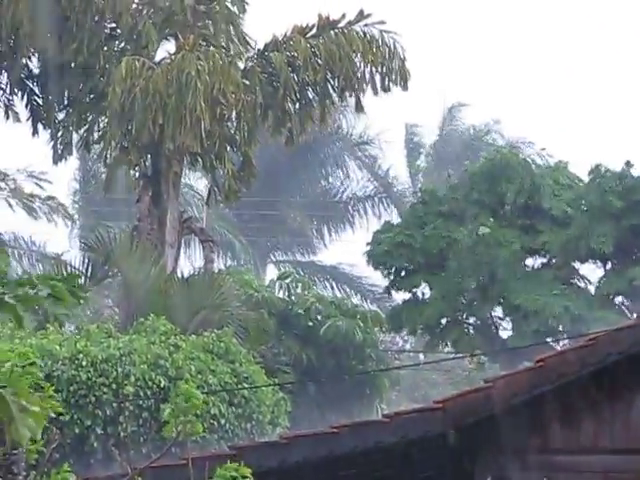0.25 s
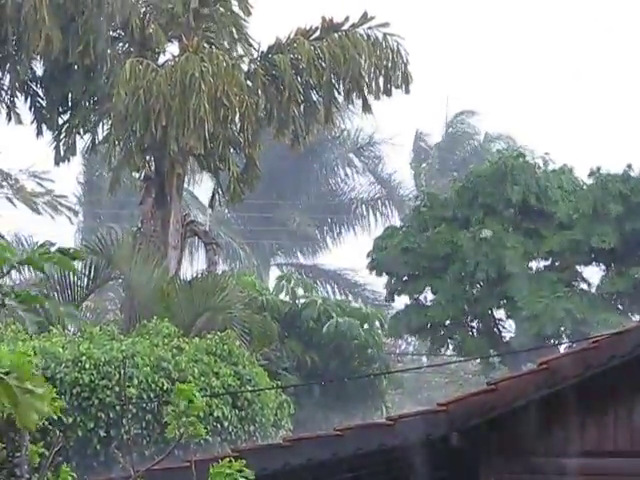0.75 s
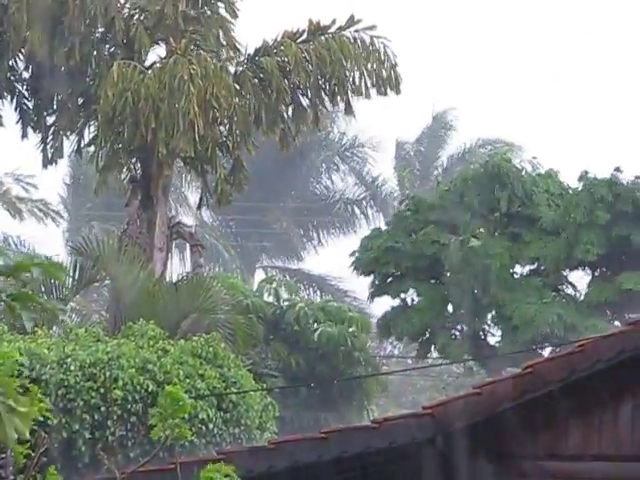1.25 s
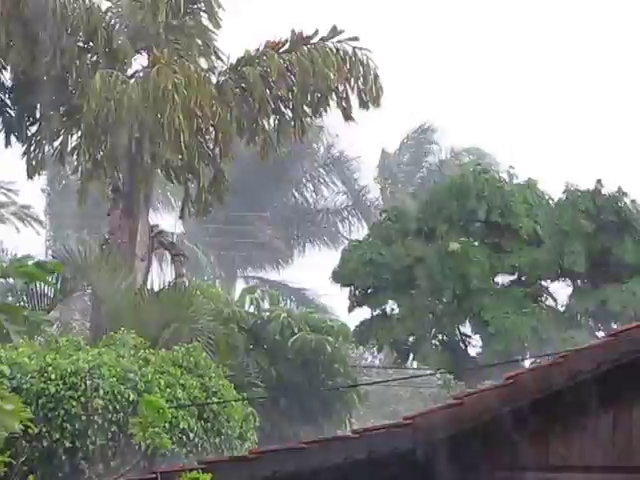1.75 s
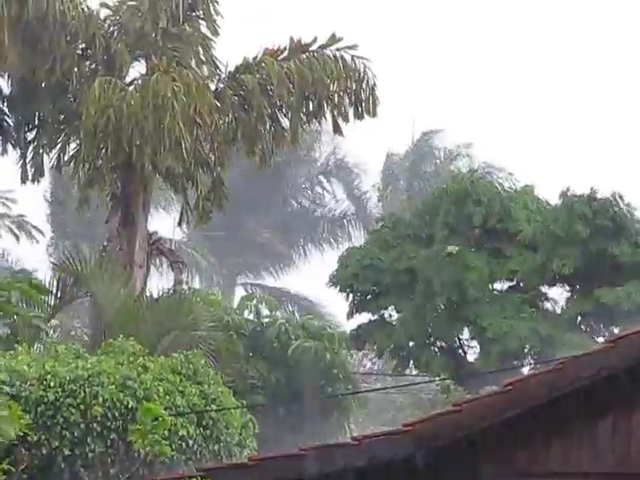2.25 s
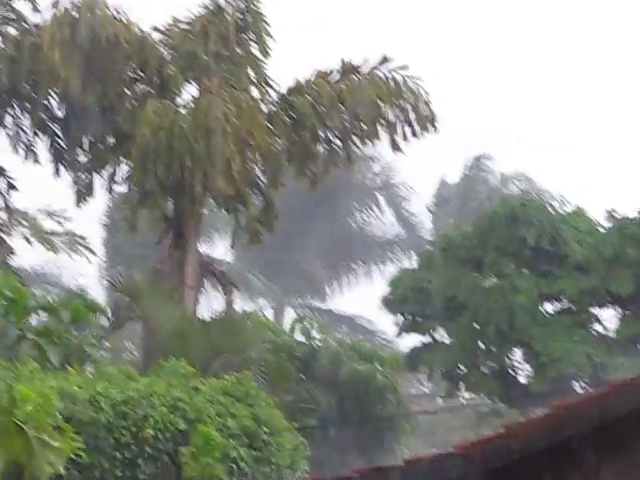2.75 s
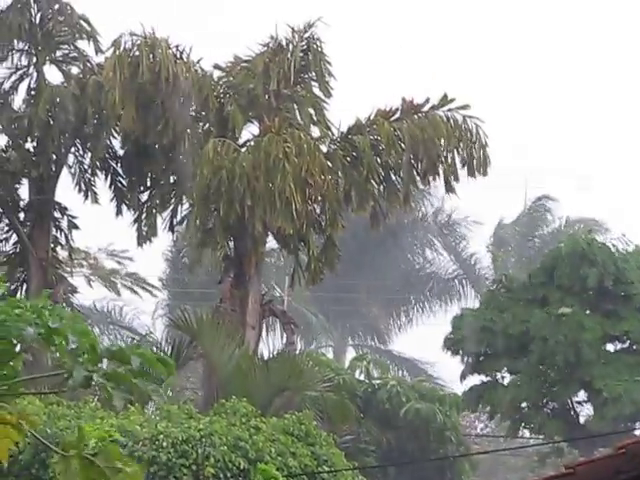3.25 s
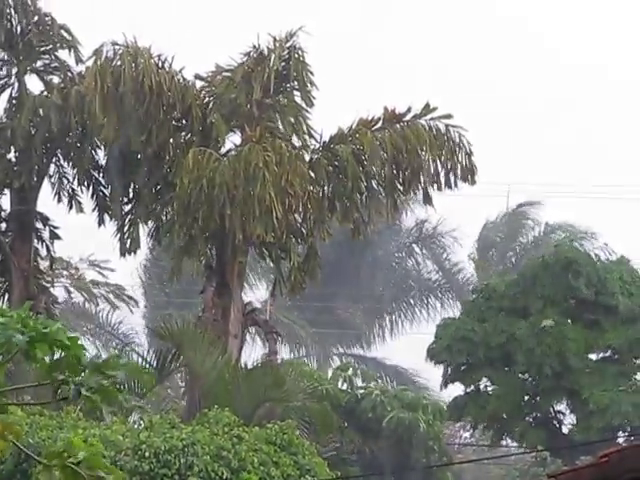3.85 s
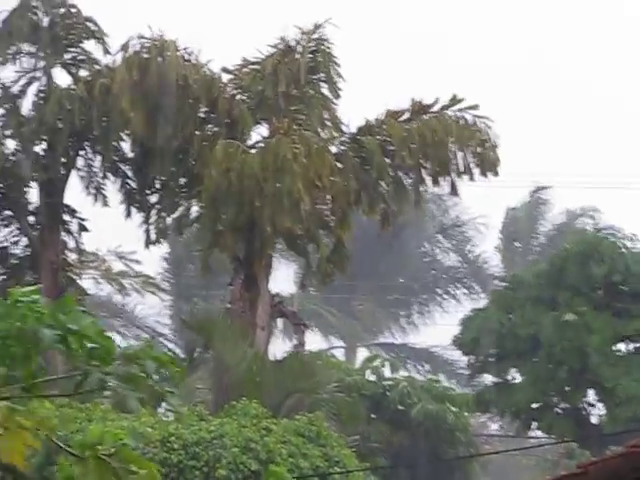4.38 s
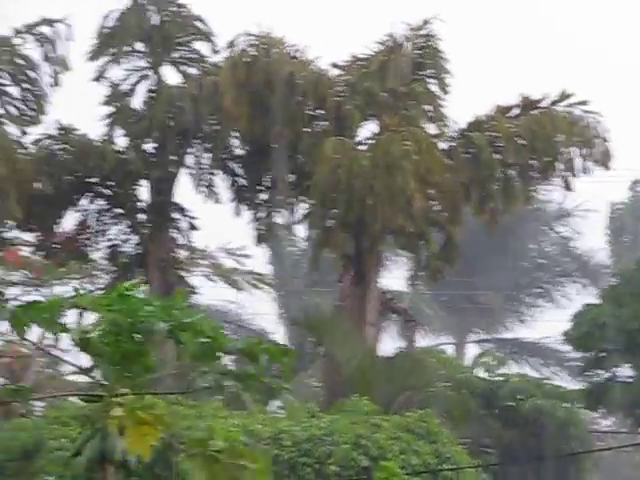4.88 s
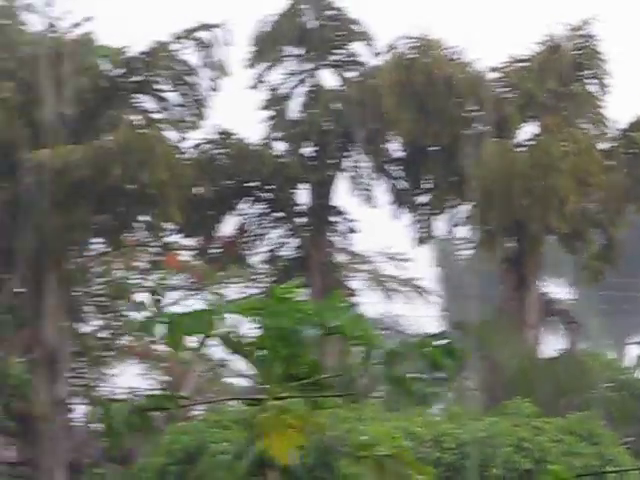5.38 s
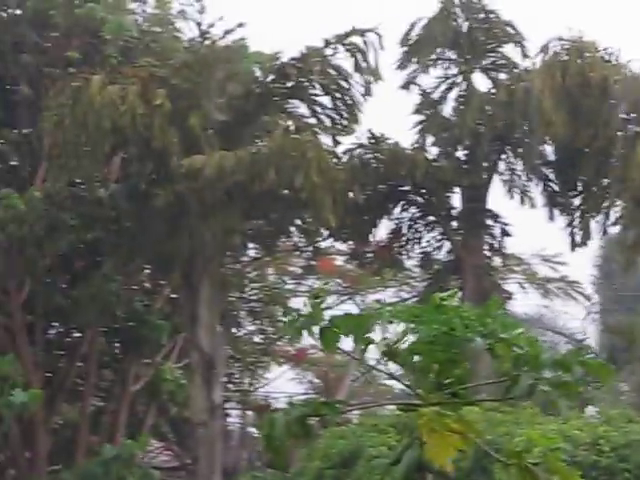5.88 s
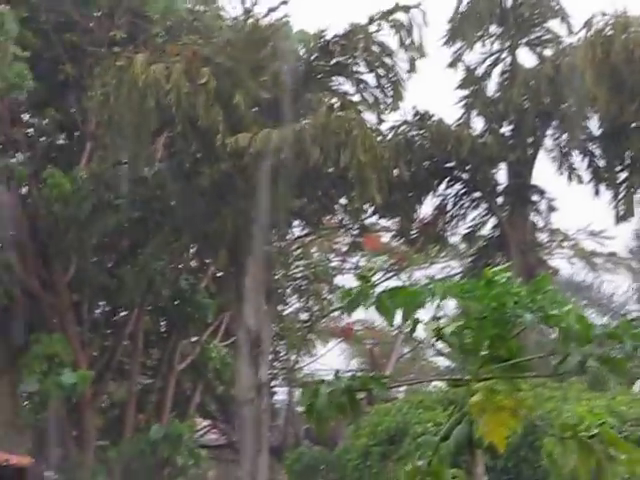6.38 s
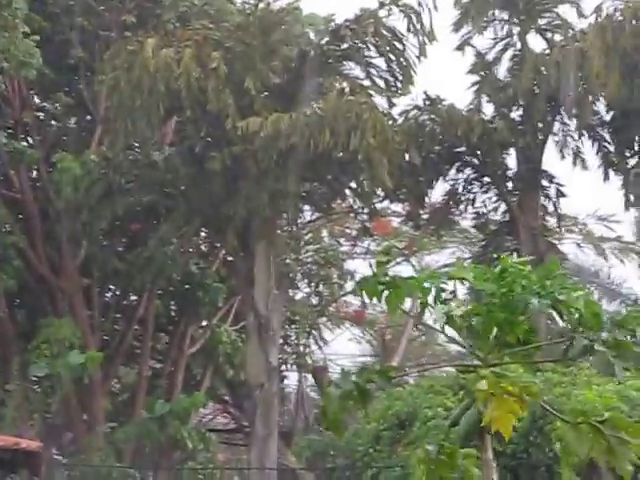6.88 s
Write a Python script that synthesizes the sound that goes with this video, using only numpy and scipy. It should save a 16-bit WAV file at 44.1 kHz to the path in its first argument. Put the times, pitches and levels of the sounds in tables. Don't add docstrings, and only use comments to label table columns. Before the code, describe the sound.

A steady tropical downpour, grainy and wide, with crisp irregular water splats near the listener, pattering leaves and brief low wind buffeting.

```python
import sys
import numpy as np
from scipy import signal
from scipy.fft import rfft, irfft
from scipy.io import wavfile
from scipy.ndimage import uniform_filter1d

SR = 44100
rng = np.random.default_rng(int(sys.argv[2]) if len(sys.argv) > 2 else 0)


def dump_mix(stems):
    frames = np.atleast_2d(stems).T
    limited = np.clip(frames, -1, 1)
    pcm = np.round(limited * 32767).astype(np.int16)
    wavfile.write(sys.argv[1], SR, pcm)


def natural_amplitude(level_db):
    exponent = np.asarray(level_db, float) / 20
    return 10 ** exponent


N = 314433

# time in seconds, level of the far rain in dB.
DOWNPOUR_LEVEL = [(0.0, -33.5), (0.1, -33.5), (0.59, -37), (0.97, -38.5), (1.61, -36), (1.67, -39),
                  (2.22, -37.5), (2.32, -38.5), (2.68, -35.5), (3.29, -35.5), (3.57, -33.5), (3.98, -35),
                  (4.05, -37), (5.24, -32.5), (5.6, -33.5), (6.15, -33.5), (7.13, -30)]


def level(x, db):
    return x * natural_amplitude(db) / np.sqrt(np.mean(x ** 2))


def rain_db():
    s, db = np.transpose(DOWNPOUR_LEVEL)
    return np.interp(np.arange(N) / SR, s, db)


def on_hz(points):
    hz, db = np.transpose(points)
    bin_hz = np.arange(N // 2 + 1) * SR / N
    return np.interp(np.log(bin_hz + 1e-3), np.log(hz), db)


def walk(rate):
    hold = int(SR / rate)
    steps = np.repeat(rng.standard_normal(N // hold + 1), hold)
    return 1.3 * uniform_filter1d(uniform_filter1d(steps, hold), hold)[:N]


def bumps(rows):
    t = np.arange(N) / SR
    return sum(height * np.exp(-.5 * ((t - s) / spread) ** 2) for s, height, spread in rows)


def add(pair, s, left_db, right_db, hz, cycles, left_late_s):
    place = np.floor(s * SR).astype(int)[:, None] + np.arange(-32, 64)
    phase = 2 * np.pi * rng.random((len(s), 1))
    for port, db, late_s in zip(pair, (left_db, right_db), (left_late_s, 0)):
        turns = hz[:, None] * (place / SR - (s + late_s)[:, None])
        spread = np.where(turns < 0, .75 * cycles, cycles)
        shape = np.exp(-.5 * (turns / spread) ** 2)
        ring = np.cos(2 * np.pi * turns + phase)
        crack = .42 * np.cos(2 * np.pi * 1.6 * turns + phase)
        np.add.at(port, np.clip(place, 0, N - 1), natural_amplitude(db)[:, None] * shape * (ring + crack))


def downpour():
    # frequency in Hz, density in dB per Hz.
    hiss_colour = [(25, -23), (60, -25), (190, -14.5), (490, -1.5), (1000, -1), (2000, 0), (3500, -3.5),
                   (5500, -5), (7400, -6.5), (8600, -13), (11500, -14), (15000, -20), (16500, -30.5)]
    port_gap_ms, left_late_ms = 0.16, 0.037
    hz = np.arange(N // 2 + 1) * SR / N
    both = np.zeros((2, N // 2 + 1), complex)
    for side in np.linspace(-1, 1, 11):
        grain_db = 2.8 * rng.standard_normal(N) + 0.42 * walk(8.2)
        drops = rng.standard_normal(N) * natural_amplitude(grain_db)
        turn = np.exp(1j * np.pi * hz * (side * port_gap_ms + left_late_ms) / 1000)
        both += rfft(drops) * np.array([1 / turn, turn])
    both += np.minimum(hz / 1500, 1.5) * rfft(rng.standard_normal((2, N)))
    hiss = irfft(both * natural_amplitude(on_hz(hiss_colour)), N)
    return level(hiss, 8.14) * natural_amplitude(rain_db())


def leaves(count):
    # time in
    # seconds, extra level in dB, spread in seconds.
    swells = [
        (0.08, 1, .05),
        (0.66, 5.5, 0.072),
        (1.45, 3.5, 0.31),
        (2.28, 8, 0.029),
        (2.68, 4.5, 0.095),
        (4.02, 7, 0.028),
        (5.4, 6.5, 0.076),
        (6.33, 9, 0.018),
        (6.85, 8, .03),
        (6.98, 8.5, 0.023),
    ]
    chance = rng.random((count, 4)).T
    s = chance[0] * N / SR
    patter_db = rain_db() - 1 + bumps(swells)
    db = patter_db[(s * SR).astype(int)] + 2.5 + 9 * chance[1] ** 2
    hz = 2400 * 1.9 ** chance[2]
    out = np.zeros((2, N))
    add(out, s, db - 1.5, db, hz, cycles=1.2, left_late_s=2e-4 * chance[3] - 5e-5)
    return out


def fizz(clicks, t60_s):
    # lower edge in Hz, upper edge in Hz, level in dB.
    spray = [(1500, 3200, -33), (3200, 5000, -31), (5000, 7500, -31), (7500, 11000, -32),
             (11000, 16000, -33)]
    out = 0
    fade = natural_amplitude(-2 * 60 * np.arange(5000) / SR / t60_s)
    for low_hz, high_hz, db in spray:
        band = signal.butter(2, [low_hz, high_hz], "band", fs=SR, output="sos")
        splat_energy = np.sum(signal.sosfilt(band, clicks) ** 2, axis=0)
        energy = signal.fftconvolve(splat_energy, fade)[:N]
        droplets = rng.standard_normal((2, N)) * natural_amplitude(7.0 * rng.standard_normal((2, N)))
        out = out + np.sqrt(np.abs(energy)) * level(signal.sosfilt(band, droplets), db)
    return out


def splats(s, db, hz, pan_db, echo_db, lag_ms):
    out = np.zeros((2, N))
    add(out, s, db + pan_db, db, hz, cycles=.85, left_late_s=6e-5)
    wall_db = db + echo_db + 10 * np.log10((1 + natural_amplitude(2 * pan_db)) / 2)
    add(out, s + lag_ms / 1000, wall_db - .5, wall_db + .5, 1.12 * hz, cycles=.8, left_late_s=2e-5)
    return out + fizz(out, t60_s=.12)


def spatter(count, floor_db, range_db, skew, low_hz, spread):
    chance = rng.random((count, 6)).T
    s = chance[0] * N / SR
    db = rain_db()[(s * SR).astype(int)] - 2 + floor_db + range_db * chance[1] ** skew
    hz = low_hz * spread ** chance[2]
    pan_db = -8 + 9 * chance[3]
    echo_db = -5 + 8 * chance[4]
    lag_ms = 3.0 + 0.711 * chance[5]
    return s, db, hz, pan_db, echo_db, lag_ms


def roof_water():
    # time in seconds, right peak in dB, ring in Hz, wall echo in dB.
    big_splats = [(.08, -8.5, 4400, -1), (.1491, -8, 3400, 1.5), (0.2403, -14.5, 6600, 8),
                  (.2675, -8, 6400, -1), (.3003, -5.5, 4800, 2), (.4038, -6.5, 5100, 3.5),
                  (.6304, -14, 4140, 3), (0.638, -10, 5300, 8.5), (0.644, -6, 8500, -12),
                  (0.7805, -2, 5200, -0.5), (1.2618, -10.5, 5800, 2), (1.3545, -8, 6860, -0.5),
                  (1.5376, -7.5, 5000, -4), (1.6173, -6, 5200, -3), (1.9815, -4.5, 4900, -1.5),
                  (2.2729, -7.5, 6740, 1), (2.814, -8, 5100, 3), (2.9064, -8, 4960, 1),
                  (3.2647, -8.5, 5250, 3), (3.476, -9.5, 7100, 5.5), (3.579, -11.5, 4930, 5.5),
                  (3.81, -5.5, 5040, 0), (3.9625, -9.5, 5400, 3.5), (4.0093, -7, 5400, 1),
                  (4.0241, -7, 5700, 4.5), (4.2785, -7.5, 7160, 2), (5.1337, -7, 5270, 0),
                  (5.5084, -13.5, 7400, 7), (5.571, -9.5, 4900, 2.5), (5.7781, -10, 4630, 4.5)]
    # time in seconds, right peak in dB, ring in Hz.
    wall_drips = [(.1012, -8, 5800), (.8422, -14, 5400), (1.0757, -15, 5700), (1.3805, -14, 7240),
                  (1.7444, -15, 6100), (1.8337, -13, 6600), (1.9953, -11, 5000), (2.1866, -14, 5670),
                  (2.5774, -13, 4900), (2.7544, -8, 5200), (2.79, -10, 6030), (3.0098, -9, 5330),
                  (3.4031, -10, 4800), (3.425, -8, 5300), (3.9895, -14, 7400), (4.2577, -7, 5000),
                  (4.3101, -8, 6470), (4.829, -10, 5500), (5.0116, -23, 5700), (5.3451, -7, 11300),
                  (5.3586, -7, 4870), (5.809, -9, 5400), (5.965, -11, 5360), (6.313, -13, 4900),
                  (6.4809, -6.5, 9900), (6.5413, -9, 5860), (6.6388, -7, 4600), (6.8608, -10, 4400),
                  (6.9193, -8.5, 4500), (6.9968, -19, 6000)]
    # time in seconds, right peak in dB, ring in Hz.
    open_drips = [(.1768, -9, 5000), (0.623, -7, 7700), (1.156, -11, 7500), (2.2469, -6.5, 7700),
                  (2.6952, -11, 5100), (3.658, -9, 4700), (3.8701, -6, 7300), (4.1582, -9, 6300),
                  (4.1824, -10, 5800), (4.8399, -11, 4600), (5.1722, -13, 7100), (5.6188, -8, 7800),
                  (2.9554, -10, 6900), (3.997, -5, 5100), (4.1268, -9, 4560), (4.9381, -14, 5100),
                  (5.0344, -8, 6300), (5.412, -14, 6000), (5.5745, -8, 5400), (5.921, -7, 6000),
                  (6.0306, -10, 6300), (6.2467, -12, 6400), (6.3321, -9, 3600), (6.3938, -8, 5300),
                  (6.5271, -8, 6700), (6.5576, -7.5, 4700), (6.7293, -4, 5900), (6.8374, -14, 4500),
                  (7.0125, -12, 6200), (7.0416, -12, 5200)]
    wall_echo_db, open_echo_db = 1, -3
    small_drips = [(*row, wall_echo_db) for row in wall_drips] + [(*row, open_echo_db) for row in open_drips]
    s, db, hz, echo_db = np.transpose(big_splats + small_drips)
    chance = rng.standard_normal((len(s), 2)).T
    pan_db = -5.5 + 1.6 * chance[0]
    lag_ms = 3.4 + .13 * chance[1]
    drips = s, db, hz, pan_db, echo_db, lag_ms
    stray = spatter(count=170, floor_db=18, range_db=4, skew=1.5, low_hz=4500, spread=2.2)
    fine = spatter(count=2500, floor_db=10.0, range_db=14, skew=2.8, low_hz=3600, spread=2.98)
    return splats(*np.hstack([drips, stray, fine]))


def wind():
    # frequency in Hz, density in dB per Hz.
    rumble_colour = [(20, -14), (50, -3), (120, -1), (270, 0), (400, -12), (700, -36)]
    # time in seconds, level in dB, spread in seconds.
    gusts = [(0.1, -53, 0.091), (0.32, -46.5, 0.055), (0.65, -41.5, 0.042), (0.76, -48.5, 0.043),
             (0.5, -54, .05), (1.0, -52, .1), (1.45, -61, .15), (2.28, -46, 0.066), (3.3, -61, 0.33),
             (3.63, -58, 0.053), (5.96, -57, .03), (6.27, -53, 0.089), (6.52, -55, .06)]
    calm_db = -69.5
    shared, left, right = irfft(rfft(rng.standard_normal((3, N))) * natural_amplitude(on_hz(rumble_colour)), N)
    buffeting = np.array([left, right]) + 1.15 * shared
    strength = natural_amplitude(calm_db) + bumps([(s, natural_amplitude(db), spread) for s, db, spread in gusts])
    return level(buffeting, -0.35) * strength * natural_amplitude(np.array([[.5], [-.5]]))


def scene():
    return downpour() + leaves(count=4000) + roof_water() + wind()


def low_pass(x):
    return signal.sosfilt(signal.butter(12, 17050, fs=SR, output="sos"), x)


def record(dry):
    # frequency in Hz, left minus right in dB.
    port_tilt = [(60, 0), (400, 0), (1300, 0), (2400, -2), (4400, 0.5), (6500, -2), (7600, 1), (8800, 4),
                 (11000, 4.5), (13000, 1.5), (16000, -1)]
    half_each = np.array([[.5], [-.5]])
    ports = irfft(rfft(dry) * natural_amplitude(half_each * on_hz(port_tilt)), N)
    low_cut = signal.butter(2, 25, "high", fs=SR, output="sos")
    top_cut = signal.ellip(12, .2, 75, 15780, fs=SR, output="sos")
    mix = signal.sosfilt(np.vstack([low_cut, top_cut]), ports)
    return low_pass(mix)


dry = scene()
out = record(dry)
dump_mix(out)
```